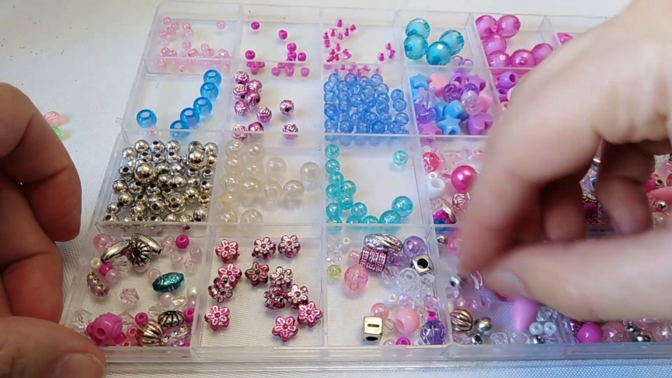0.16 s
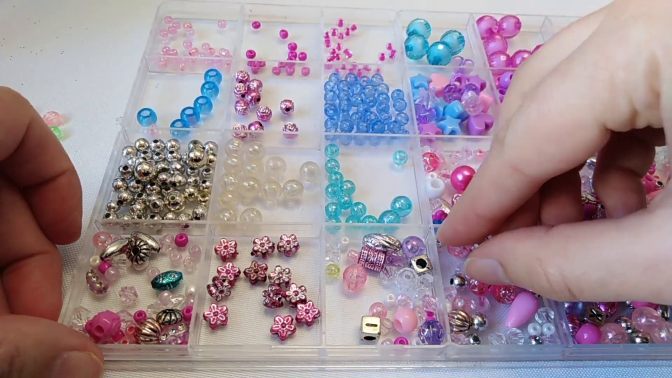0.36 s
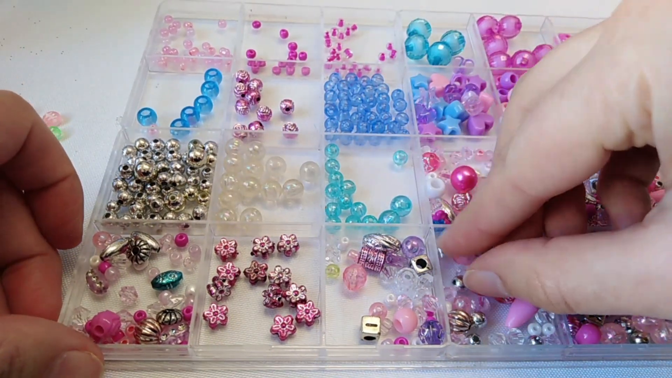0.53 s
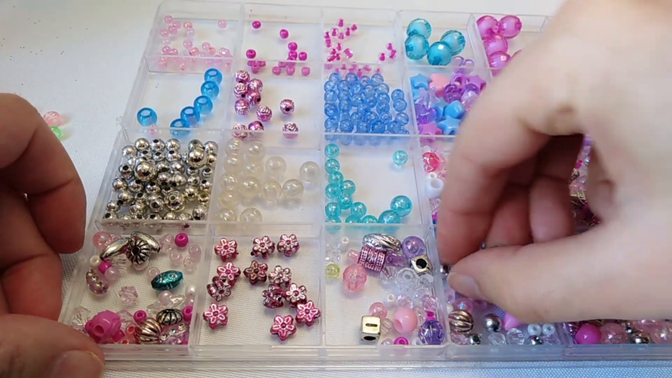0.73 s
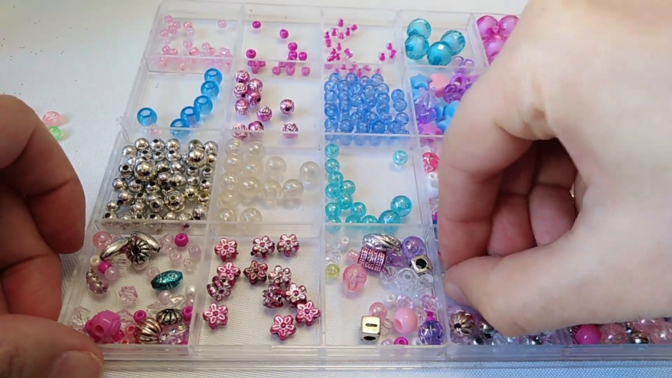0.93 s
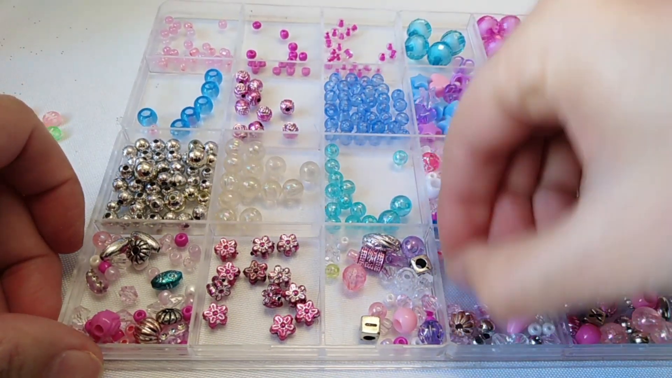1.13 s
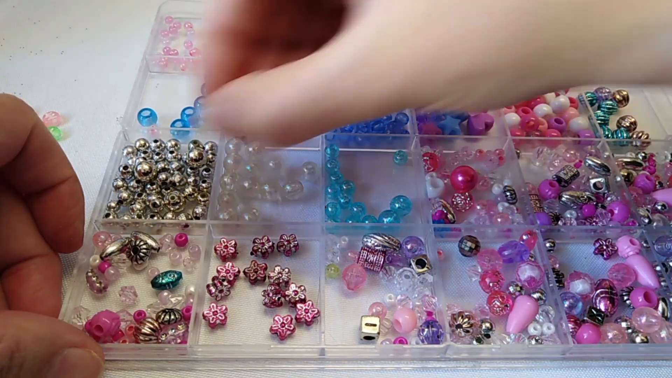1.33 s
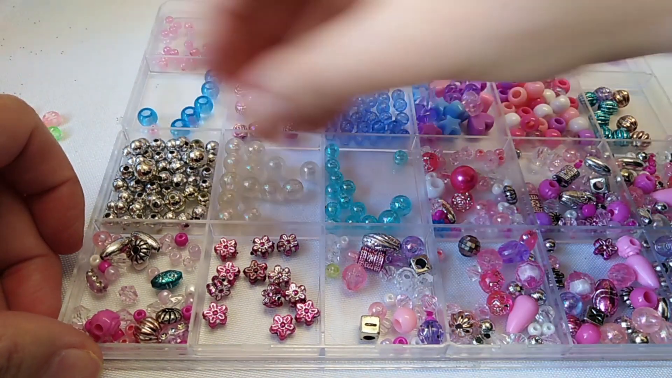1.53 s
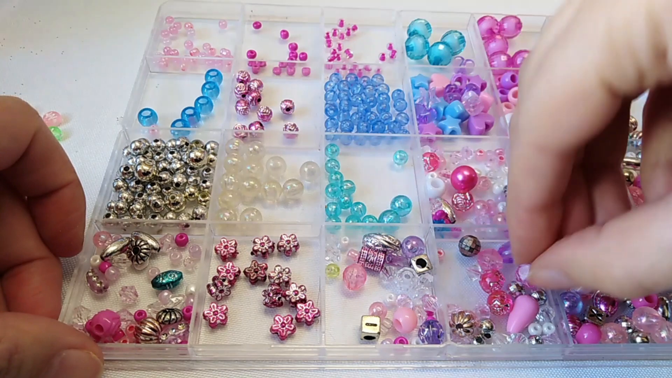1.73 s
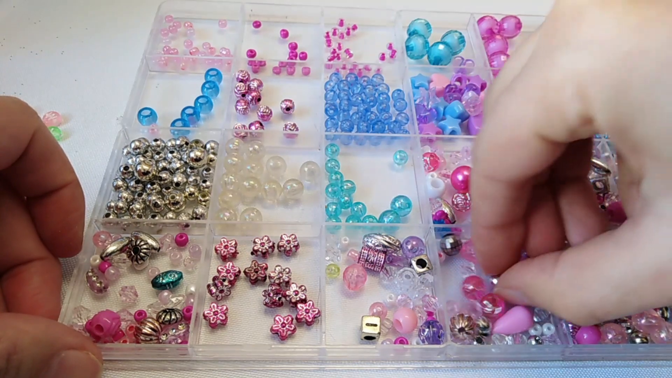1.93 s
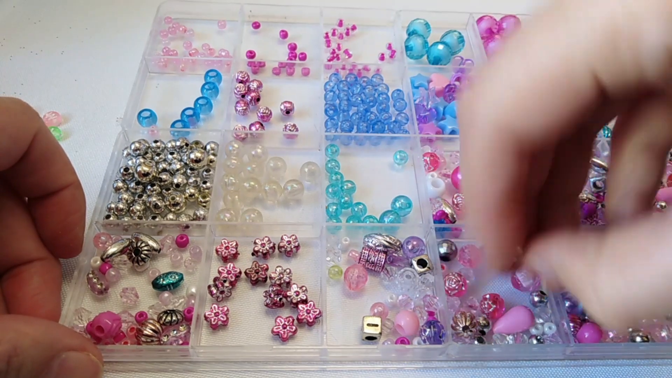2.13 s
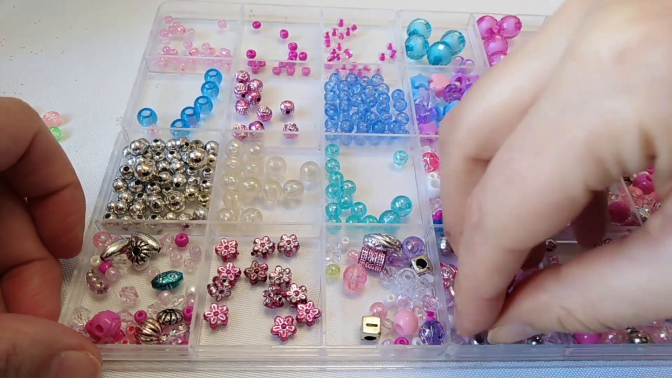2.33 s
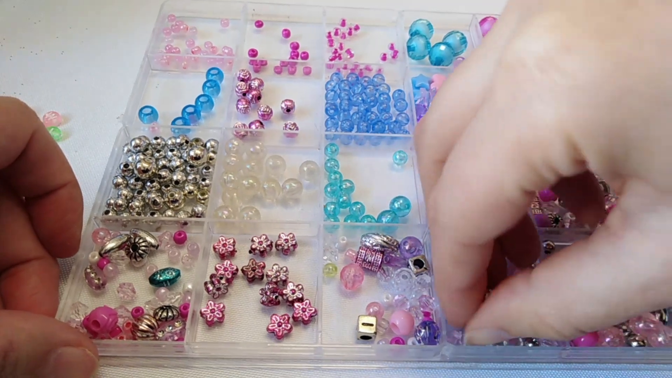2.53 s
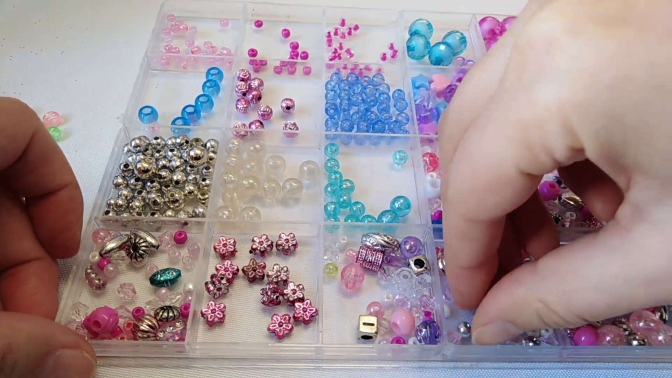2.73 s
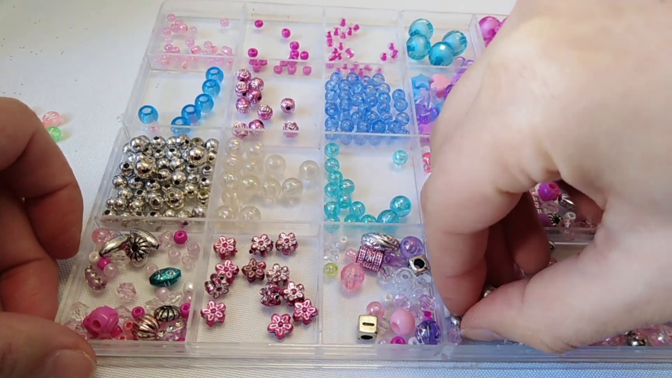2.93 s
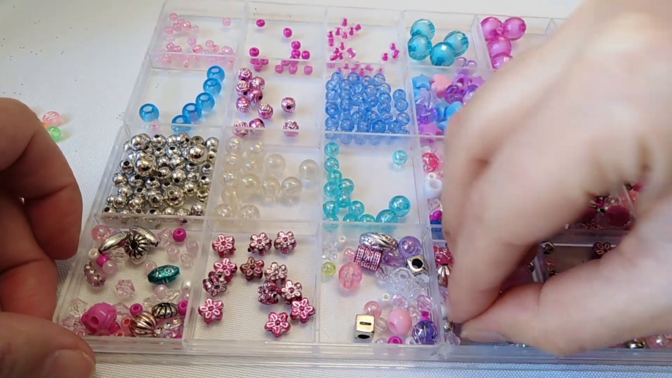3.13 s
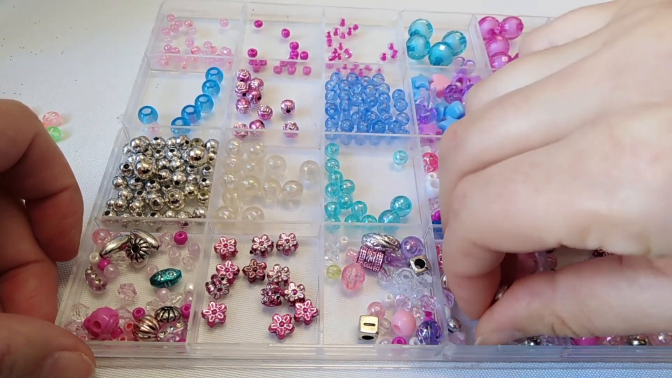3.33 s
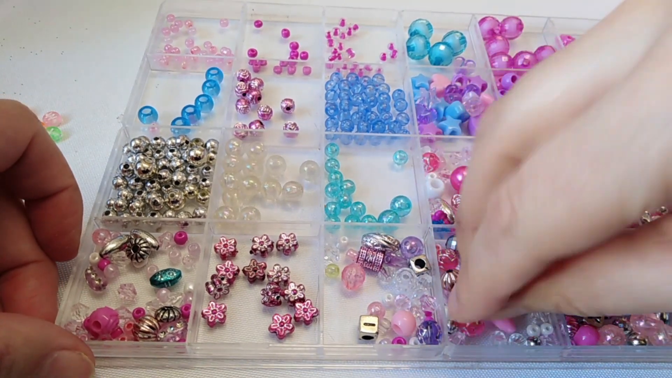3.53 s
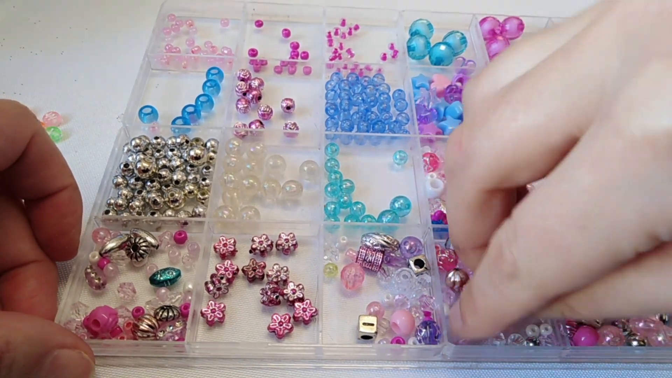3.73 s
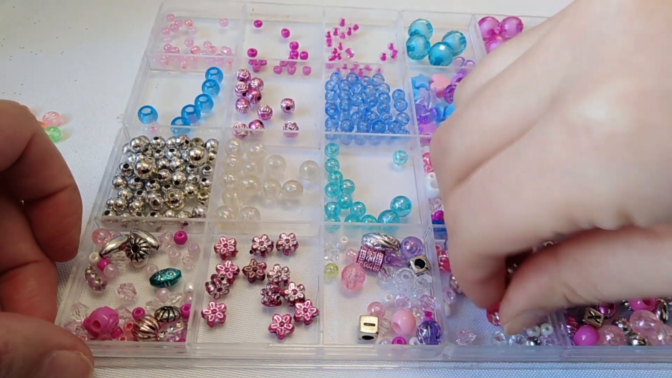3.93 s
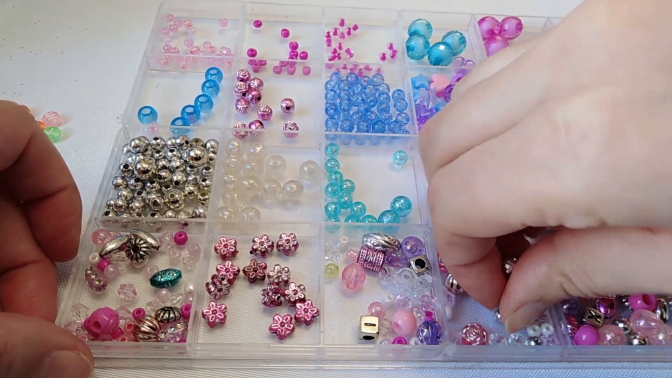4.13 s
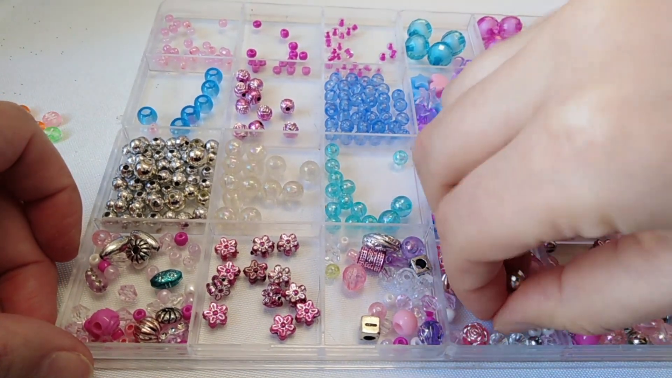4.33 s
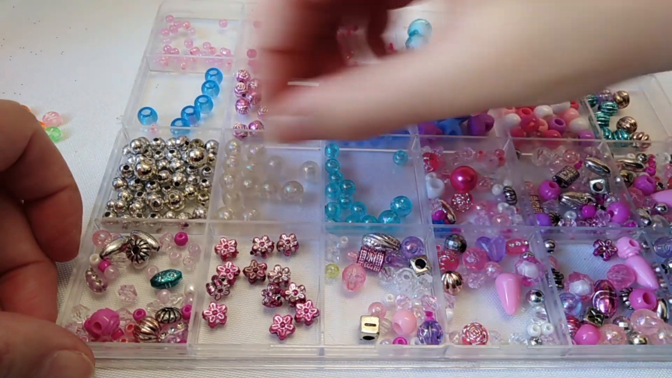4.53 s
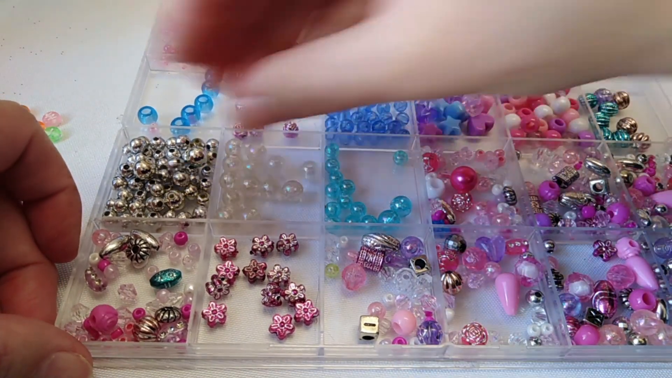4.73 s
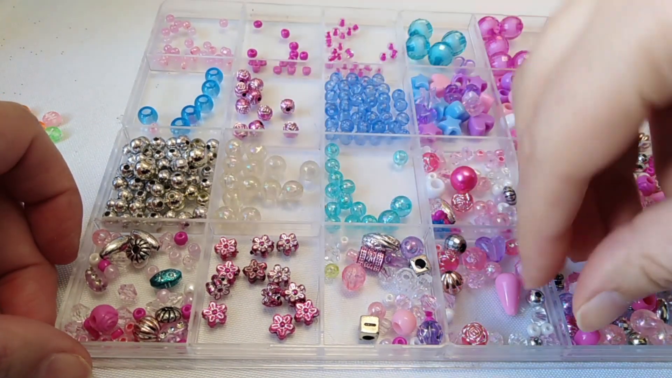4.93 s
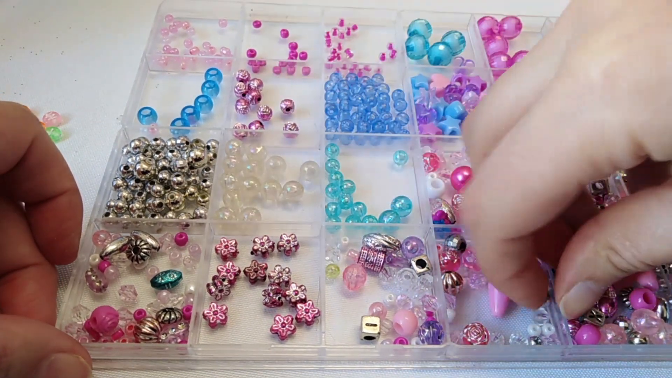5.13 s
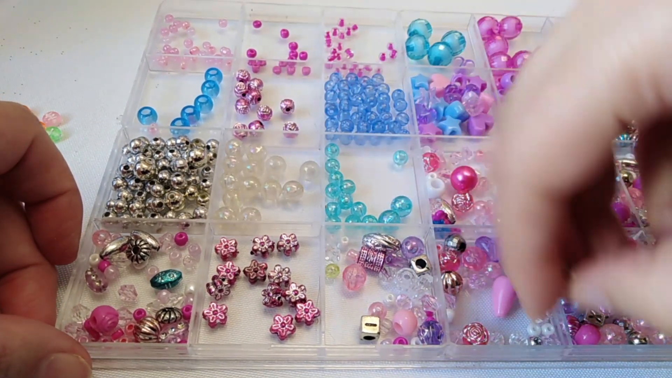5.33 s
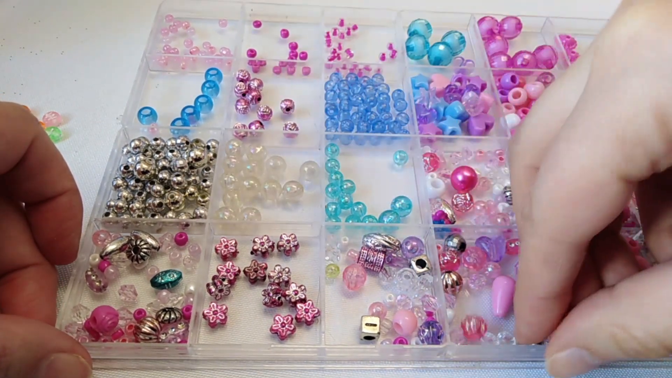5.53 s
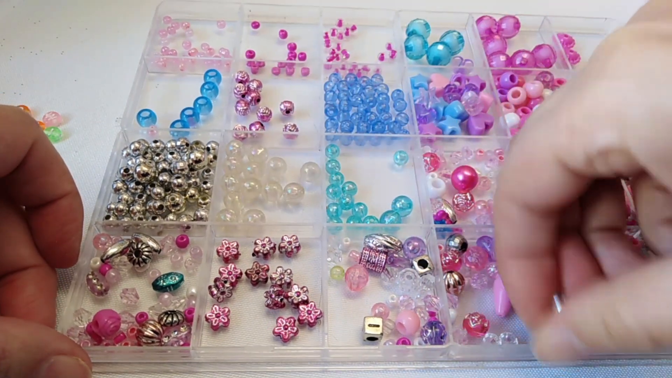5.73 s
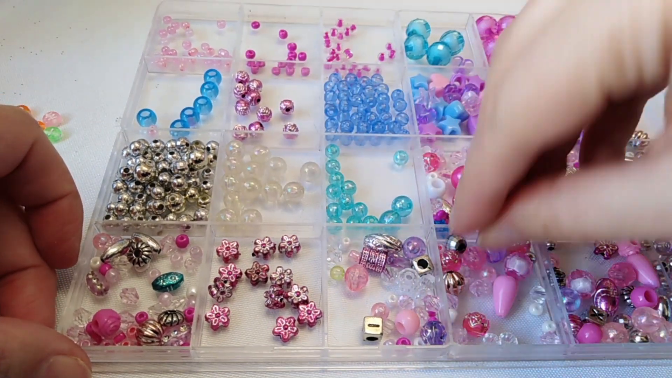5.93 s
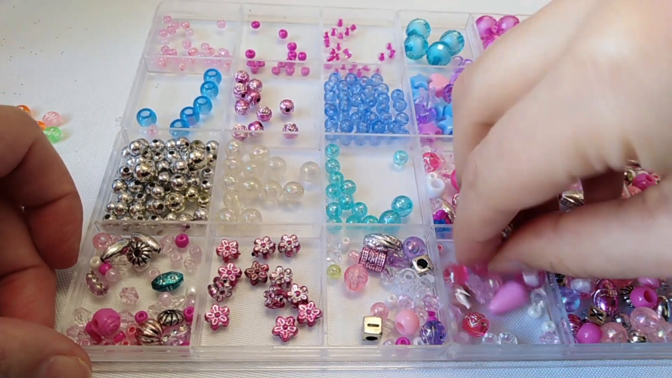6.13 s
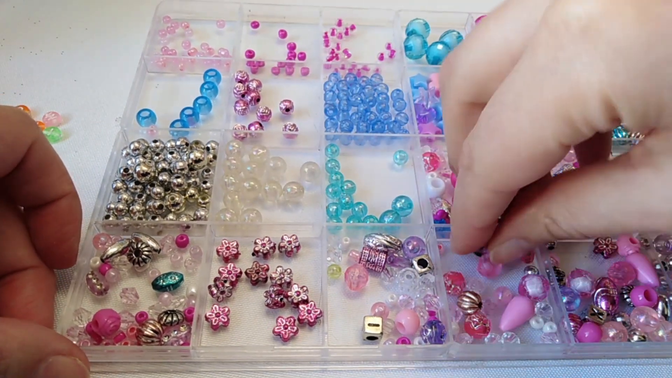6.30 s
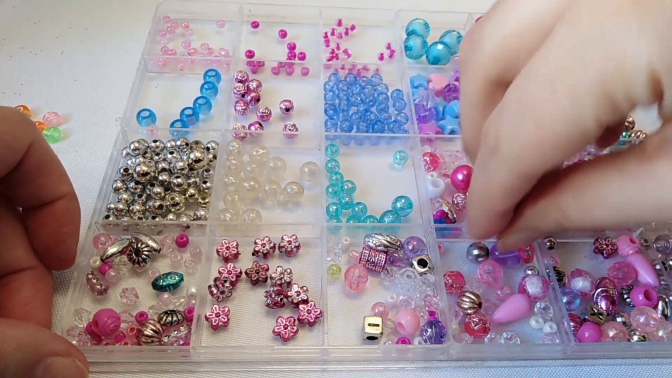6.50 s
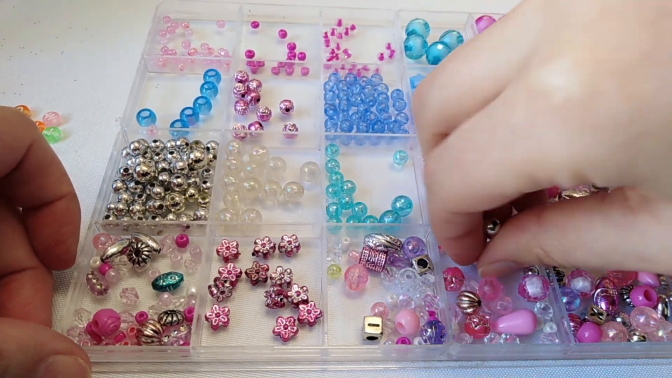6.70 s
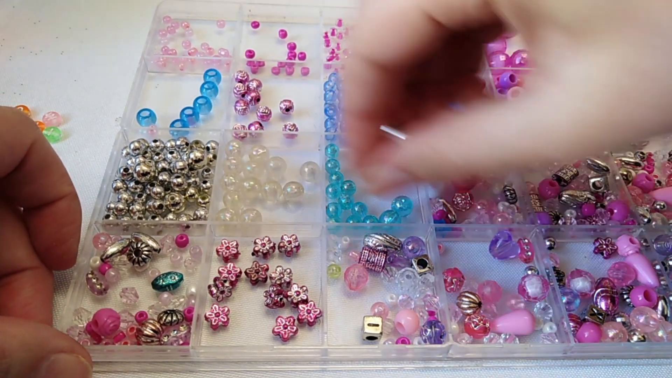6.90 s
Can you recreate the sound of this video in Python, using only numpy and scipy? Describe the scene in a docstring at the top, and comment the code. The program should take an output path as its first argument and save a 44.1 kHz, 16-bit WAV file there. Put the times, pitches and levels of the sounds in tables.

```python
"""A small room, microphone close to a hard plastic compartment tray: fingers sort small acrylic beads.
Single knocks and quick runs of three are cracks of noise with short damped modes of bead and tray walls.
Each stroke of the hand stirs up a rustle of many slight contacts, then a few ticks as the heap settles.
Fingertips thud on the tray in its low modes, and a puff of air, low-band noise, buffets the right port.
Behind it lie a weak room tail and a faint hiss; the beads sit to the right, the left port is duller."""
import sys
import numpy as np
from scipy import signal
from scipy.fft import rfft, irfft, next_fast_len
from scipy.io import wavfile

SR = 44100
rng = np.random.default_rng(int(sys.argv[2]) if len(sys.argv) > 2 else 0)


def generate_wav(signal):
    """Clip the signal to [-1, 1] and save it as 16-bit WAV at the path in sys.argv[1]."""
    frames = np.transpose(np.atleast_2d(signal))
    scaled = np.clip(frames, -1, 1) * 32767
    pcm = np.round(scaled).astype(np.int16)
    wavfile.write(sys.argv[1], SR, pcm)


N = 306925

# Hiss spectrum, before its overall level is set. Each row: frequency in Hz, relative level in dB.
HISS_COLOUR = [(30, -8), (800, -21), (14000, -20.5)]
# Decay of the small room. Each row: frequency in Hz, time to lose 60 dB in s.
ROOM_DECAY = [(3000, .22), (13000, .1)]
# Low modes of the whole tray flexing on the table, before random spread.
# Each row: frequency in Hz, relative level in dB, time to lose 60 dB in s.
TRAY_MODES = [(83.5, -2.5, 0.13), (134, -6.5, 0.16), (246.5, 4, 0.047), (407, -12, .025)]
# Fingers bumping the tray. Each row: time in s, level in dB.
BUMPS = [(.421, -47.5), (.504, -49), (2.244, -54), (2.916, -53), (3.687, -53.5), (5.595, -47.5)]
# Ring of the thin compartment walls, before random spread.
# Each row: frequency in Hz, relative level in dB, time to lose 60 dB in s.
WALL_MODES = [(940, -6, 0.013), (2778, -10, 0.02), (3852, -6, 0.027), (5160, -5, 0.024), (6620, -5, 0.025),
              (9550, -1, 0.016), (11960, -1.5, 0.011)]
# Colour shared by all bead contacts. Each row: frequency in Hz, relative level in dB.
BEAD_COLOUR = [(400, -32.5), (700, -33), (1000, -20.5), (1500, -15.5), (2100, -8.5), (2800, -1.5),
               (5300, 0.5), (9800, 2.5), (12500, -4.5), (14200, -15.5), (15200, -41.5)]
# Finger strokes that shift the heap, from a hard push to a light touch. Each row: start in s, end in s,
# relative level of the bead rustle in dB, relative level of the rub on the tray floor in dB.
STROKES = [(0, 0.155, -47.5, -79.5), (0.21, 0.265, -31, -63.5), (0.268, 0.364, -59, -90),
           (0.388, 0.558, -61, -69.5), (0.583, 0.668, -42, -59.5), (0.724, .879, -57.5, -71.5),
           (0.919, 0.985, -42.5, -65), (1.124, 1.18, -58, -87.5), (1.47, 1.596, -42.5, -67),
           (1.831, 2.089, -48.5, -74), (2.091, 2.188, -38, -74), (2.236, 2.323, -39.5, -60),
           (2.329, 2.407, -56.5, -71.5), (2.445, 2.551, -60.5, -71), (2.556, 2.632, -46, -79),
           (2.658, 2.767, -43.5, -67.5), (2.888, 3.108, -61.5, -78.5), (3.134, 3.181, -45.5, -82),
           (3.271, 3.372, -55.5, -87.5), (3.383, 3.467, -44.5, -86.5), (3.473, 3.63, -60, -87.5),
           (3.798, 3.937, -63, -74.5), (3.939, 4.07, -47.5, -69.5), (4.093, 4.206, -49, -81),
           (4.229, 4.305, -46.5, -68), (4.319, 4.434, -62.5, -85), (4.713, 4.784, -35, -62.5),
           (4.788, 4.876, -62, -72), (5.05, 5.116, -48, -70.5), (5.196, 5.247, -49, -84),
           (5.503, 5.659, -49.5, -63), (5.692, 5.786, -49, -80), (5.847, 5.9, -47.5, -75),
           (6.047, 6.16, -55, -57), (6.159, 6.263, -40.5, -60.5), (6.257, 6.421, -55, -60),
           (6.411, 6.58, -65, -70.5), (6.597, 6.721, -55, -70), (6.94, 6.962, -49.5, -77)]
# Single beads knocking on a wall or the tray floor.
# Each row: time in s, level in dB, brightness in dB per octave.
KNOCKS = [(.061, -34, 0), (0.124, -28.5, -1), (0.204, -26, 2), (.423, -37.5, -4), (.505, -45.5, -0.5),
          (.869, -40, 5), (.947, -25, 4.5), (1.083, -35, -2.5), (1.197, -31, 1), (1.207, -33, -1.5),
          (1.468, -22.5, 2.5), (1.476, -27.5, -2), (1.499, -14.5, 9), (1.521, -21.5, 2.5), (1.841, -31, 1),
          (1.972, -25, 3.5), (2.057, -28, 0), (2.089, -22.5, -1), (2.248, -20, .5), (2.27, -23, 4),
          (2.362, -42, -0.5), (2.476, -41.5, 1.5), (2.681, -23.5, 5), (2.697, -26.5, 4.5),
          (2.755, -27.5, 2.5), (2.866, -50.5, 2.5), (2.914, -20.5, 5), (3.148, -30.5, 6.5),
          (3.335, -33, -0.5), (3.425, -18.5, 0), (3.489, -41, -4), (3.684, -26, 9.5), (3.794, -47, 0),
          (3.916, -42.5, 3), (3.963, -30.5, 7.5), (4.002, -24.5, -1), (4.265, -37.5, -3.5),
          (4.399, -32, -3.5), (5.055, -33, 4), (5.169, -41, -3.5), (5.201, -38, 5), (5.307, -50, 2),
          (5.582, -31.5, 5), (5.597, -34.5, -4), (5.859, -29.5, 6), (5.879, -32.5, -4.5), (5.89, -33.5, -2),
          (5.929, -42, 1.5), (6.054, -32, -1), (6.121, -39.5, 2), (6.252, -30.5, 7), (6.325, -31.5, 0),
          (6.373, -31, -2), (6.467, -39, -4), (6.713, -39, -0.5), (6.839, -52, 2.5), (6.954, -33.5, 0)]
# A bead rattling or bouncing in a quick run of contacts. Each row: start in s, first level in dB,
# brightness in dB per octave, gap between contacts in s, growth in dB per contact.
CLATTERS = [(.222, -15.5, 1.5, 0.01, -0.5), (0.607, -31, 3.5, 0.011, 6.5), (.785, -36, -0.5, 0.018, 1.5),
            (1.558, -23.5, 11.5, 0.0082, -2.5), (2.107, -19, 0.5, .0075, 0), (4.683, -16, 5, 0.042, 0),
            (6.189, -33, 0, .011, 5)]
# Where the hand works, before the left port is shaded. Each row: time in s, left minus right in dB.
HAND_PLACE = [(.2, -5.5), (.6, -5.5), (1.5, -4.5), (2.15, -4.5), (3.502, -5), (4.2, -3.5), (4.699, -5),
              (5.8, -5.5)]

ROOM_DB = -32  # room tail against the beads
PUFF_S = 1.378  # start of the puff of air
STOP_HZ = 16600  # the low-pass is 70 dB down from here up


def amp(db):
    """Linear gain of a level in dB."""
    return 10 ** (np.asarray(db) / 20)


def unit(x):
    """x scaled to rms 1."""
    return x / np.sqrt(np.mean(x ** 2) + 1e-20)


def along(points, hz):
    """Values at hz, read between (Hz, value) points on a log axis."""
    f, v = np.transpose(points)
    return np.interp(np.log(hz + 1), np.log(f + 1), v)


def fade(t, t60):
    """Exponential decay that loses 60 dB in t60 seconds."""
    return np.exp(-np.log(1000) * t / t60)


def add(track, s, sound):
    """Mix a stereo sound into the track at time s, or at 0 if s is earlier."""
    start = max(0, round(s * SR))
    part = track[:, start:start + sound.shape[1]]
    part += sound[:, :part.shape[1]]


def coloured(x, db_of_hz):
    """x through a causal minimum-phase filter with the given gain curve, made by folding its cepstrum."""
    m = 2 * next_fast_len(x.shape[-1])
    gain = amp(db_of_hz(np.fft.rfftfreq(m, 1 / SR)))
    cepstrum = irfft(np.log(gain), m)
    cepstrum[1:m // 2] *= 2
    cepstrum[m // 2 + 1:] = 0
    response = np.exp(rfft(cepstrum))
    return irfft(rfft(x, m) * response, m)[..., :x.shape[-1]]


def ring(t, hz, gain, t60):
    """Damped modes; one output per row of gain, each with its own random phase for every mode."""
    phase = np.exp(2j * np.pi * rng.random(gain.shape))
    modes = np.exp(2j * np.pi * hz[:, None] * t) * fade(t, t60[:, None])
    return ((gain * phase) @ modes).imag


def scattered(start, end, rate):
    """Uneven times, rate a second on average, that bunch and leave gaps."""
    count = max(1, round((end - start) * rate))
    marks = np.cumsum(rng.gamma(2, size=count + 1))
    return start + (end - start) * marks[:-1] / marks[-1]


def hiss(level_db=-96):
    """Steady coloured noise, independent at the two ports."""
    noise = rng.standard_normal((2, N))
    return amp(level_db) * unit(coloured(noise, lambda hz: along(HISS_COLOUR, hz)))


def room(x):
    """A weak diffuse tail of decaying noise, 5 ms behind the source; the treble dies first."""
    hz, t, z = signal.stft(rng.standard_normal((2, SR // 3)), SR, nperseg=256)
    decay = fade(t, along(ROOM_DECAY, hz)[:, None])
    tail = signal.istft(z * decay, SR, nperseg=256)[1]
    tail = np.pad(tail / np.linalg.norm(tail[0]), ((0, 0), (SR // 200, 0)))
    return signal.fftconvolve(x[None], tail, axes=1)[:, :N]


def puff(rise_s=0.059, air_t60=0.32, level_db=-47, far_db=-14):
    """Air pushed by the passing hand buffets the nearer, right port; the left gets the same, weaker."""
    t = np.clip(np.arange(N) / SR - PUFF_S, 0, None)
    swell = np.clip(t / rise_s, 0, 1) * fade(np.clip(t - rise_s, 0, None), air_t60)
    band = signal.butter(2, [60, 135], "band", fs=SR, output="sos")
    air = unit(signal.sosfilt(band, rng.standard_normal(N)))
    return amp([[level_db + far_db], [level_db]]) * swell * air


def thud(attack_s=0.0017, apart=.45):
    """A soft fingertip excites only the low modes of the tray, much alike at both ports."""
    t = np.arange(SR // 8) / SR
    hz, db, t60 = np.transpose(TRAY_MODES)
    pitches = hz * np.exp(rng.normal(0, .08, len(hz)))
    gains = amp(db + rng.normal(0, 2, (2, len(hz))))
    mid, side = ring(t, pitches, gains, t60)
    onset = 1 - np.exp(-t / attack_s)
    return np.array([mid - apart * side, mid + apart * side]) * onset


def fingers(drag_db=-2, slips_per_s=45, spread_db=4):
    """Single bumps on the tray, and uneven slips where a stroke drags over its floor."""
    out = np.zeros((2, N))
    for s, db in BUMPS:
        add(out, s, amp(db) * thud())
    for start, end, _, db in STROKES:
        for s in scattered(start, end, slips_per_s):
            uneven_db = spread_db * np.clip(rng.standard_normal(), -2, 2)
            add(out, s, amp(db + drag_db + uneven_db) * thud())
    return out


def own_tone():
    """Every contact has a resonance of its own, between 2.2 and 11 kHz: a gain curve in dB over Hz."""
    centre, boost_db, octaves = 2200 * 5 ** rng.random(), 8, .1
    return lambda hz: boost_db / (1 + (np.log2((hz + 1) / centre) / octaves) ** 2)


def contact(brightness, ring_t60=0.014, crack_t60=0.0098, wall_db=-13, scatter_db=-22,
            attack_s=0.003, alike=0.37):
    """One click, rms 1 over its first 6 ms: a crack, the ring of the spot hit, the walls and echoes."""
    t = np.arange(SR // 22) / SR
    # acrylic is well damped: the spot rings only briefly
    pitches = rng.uniform(900, 14500, size=22)
    strengths = amp(rng.normal(0, 4, (2, len(pitches))))
    strengths /= np.linalg.norm(strengths, axis=1, keepdims=True)
    spot = ring(t, pitches, strengths, np.full(len(pitches), ring_t60))

    hz, db, t60 = np.transpose(WALL_MODES)
    wall_pitches = hz * (1 + rng.normal(0, 0.036, len(hz)))
    wall_gains = amp(wall_db + db + rng.normal(0, 1, (2, len(hz))))
    walls = ring(t, wall_pitches, wall_gains, t60)

    # the crack scatters between the dividers, the hand and the table
    echoes = amp(scatter_db) * fade(t, .055)
    crack = rng.standard_normal((2, len(t))) * (fade(t, crack_t60) + echoes)
    blow = (spot + walls + crack) * (1 - np.exp(-t / attack_s))
    tone = own_tone()

    def colour(f):
        tilt = brightness * np.log2(np.clip(f, 1500, None) / 6000)
        return along(BEAD_COLOUR, f) + tone(f) + tilt

    near, other = coloured(blow, colour)
    # the far port hears it 4 samples later and partly by other paths
    delayed = np.pad(near, (4, 0))[:len(t)]
    far = alike * delayed + np.sqrt(1 - alike ** 2) * other
    pair = np.array([far, near])
    opening = pair[:, :round(.006 * SR)]
    return pair / np.sqrt(np.mean(opening ** 2, axis=1, keepdims=True))


def settling(settle_s=0.058, settle_db=-17, fall_db=-14, spread_db=4, brightness=-.5, count=6):
    """After each stroke the heap settles in a few ticks, fainter on the whole as they go."""
    out = np.zeros((2, N))
    kinds = [contact(brightness + rng.normal(0, 2)) for _ in range(24)]
    for _, end, db, _ in STROKES:
        for u in (np.arange(count) + rng.random(count)) / count:
            size = amp(db + settle_db + fall_db * u + spread_db * rng.uniform(-1, 1))
            add(out, end + settle_s * u, size * kinds[rng.integers(len(kinds))])
    return out


def rustle(rate=240, spread_db=9.0, brightness=-1, level_db=-1):
    """Stirred beads jostle in slight uneven contacts: dense in a hard push, single ticks in a light touch."""
    out = np.zeros((2, N))
    kinds = [contact(brightness + rng.normal(0, 2)) for _ in range(64)]
    for start, end, db, _ in STROKES:
        density = rate * min(amp(db + 50) ** .6, 1.8)  # contacts per second
        count = max(2, round((end - start) * density))
        times = start + (end - start) * (np.arange(count) + rng.random(count)) / count
        # each push swells and dies away
        push = np.sqrt(np.sin(np.pi * (np.arange(count) + .5) / count))
        uneven = amp(spread_db * np.clip(rng.standard_normal(count), -2, 1.7))
        sizes = unit(push * uneven)
        picks = rng.integers(len(kinds), size=count)
        for s, size, kind in zip(times, sizes, picks):
            add(out, s, amp(db + level_db) * size * kinds[kind])
    return out


def heap_moves(s):
    """Whether a stroke is well under way at time s."""
    return any(start + .012 < s < end for start, end, _, _ in STROKES)


def knock(db, brightness, in_stroke, early_db=-16, outside_db=-15, early_s=0.0058,
          rebound_db=-18, rebound_s=.011):
    """A bead lands and rebounds: rows of (delay s, sound)."""
    early, late = rng.uniform(.3, 1.3, 2)
    light = contact(brightness)
    # a fainter click is heard just ahead, fainter still outside the strokes
    early_gain = amp(db + early_db + (0 if in_stroke else outside_db))
    return [(-early_s * early, early_gain * light),
            (0, amp(db) * contact(brightness)),
            (rebound_s * late, amp(db + rebound_db) * light)]


def clicks(count=3):
    """The distinct knocks: single ones, and evenly spaced runs that swell, hold or die away."""
    out = np.zeros((2, N))
    events = list(KNOCKS)
    for s, db, brightness, gap, growth_db in CLATTERS:
        for k in range(count):
            events.append((s + k * gap, db + k * growth_db, brightness))
    for s, db, brightness in events:
        for delay, sound in knock(db, brightness, heap_moves(s)):
            add(out, s + delay, sound)
    return out


def scene():
    """The beads lie to the right; the left port is shaded, most in the treble."""
    beads = clicks() + rustle() + settling()
    ratio = amp(np.interp(np.arange(N) / SR, *np.transpose(HAND_PLACE)))
    balance = np.array([ratio, np.ones(N)]) * np.sqrt(2 / (1 + ratio ** 2))  # keeps the summed power
    left, right = beads * balance
    left = coloured(left, lambda hz: along([(5000, -1), (9500, -7.5)], hz))
    tail = amp(ROOM_DB) * room(beads[1])
    return np.array([left, right]) + tail + fingers() + puff() + hiss()


def record(dry):
    """The microphone chain rounds off the highest peaks, then a steep low-pass cuts the top treble."""
    rounded = dry / (1 + np.abs(dry / .68) ** 4) ** (1 / 4)
    low_pass = signal.cheby2(12, 70, STOP_HZ, fs=SR, output="sos")
    return signal.sosfilt(low_pass, rounded)


dry = scene()
out = record(dry)
generate_wav(out)
```